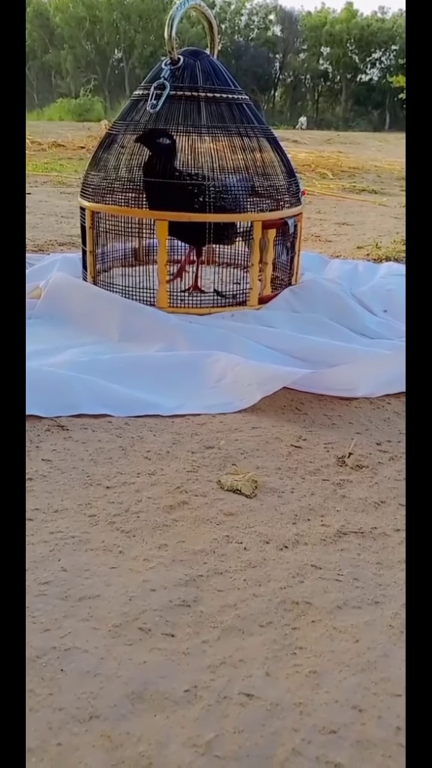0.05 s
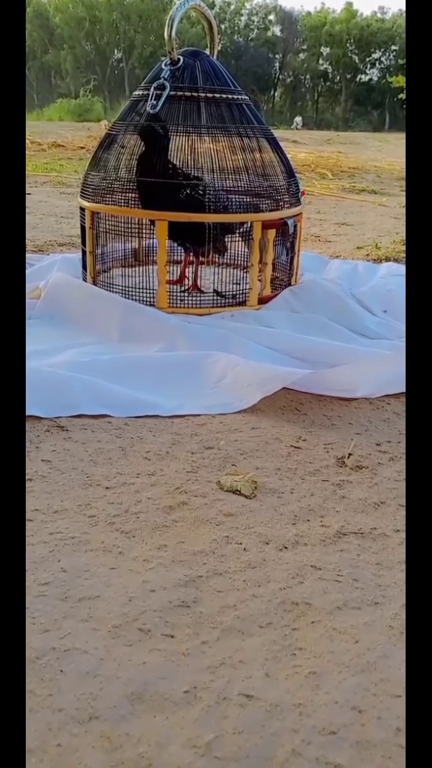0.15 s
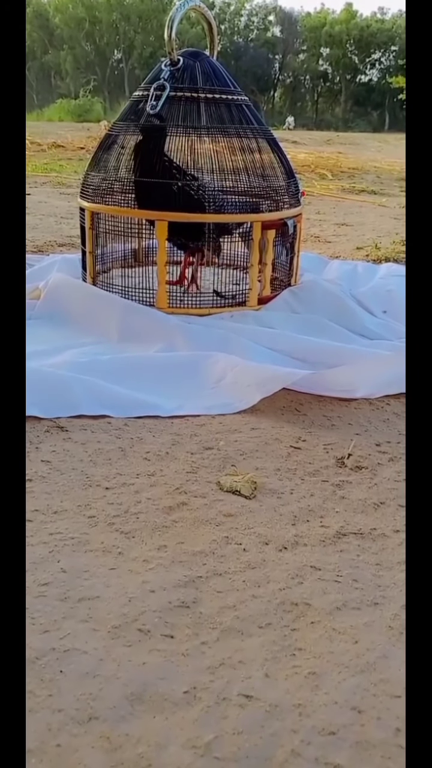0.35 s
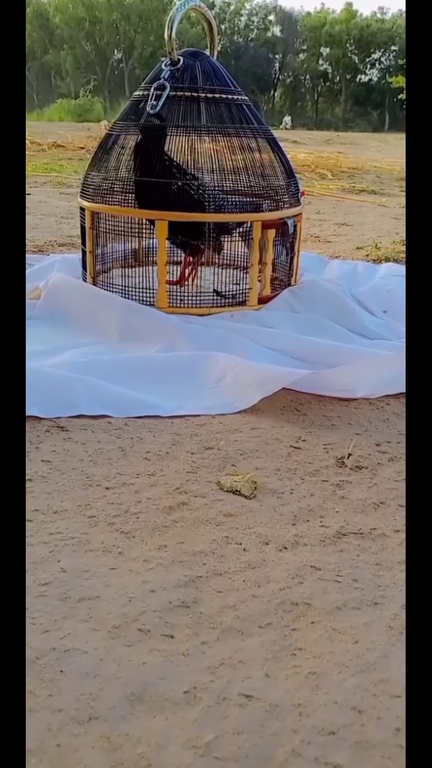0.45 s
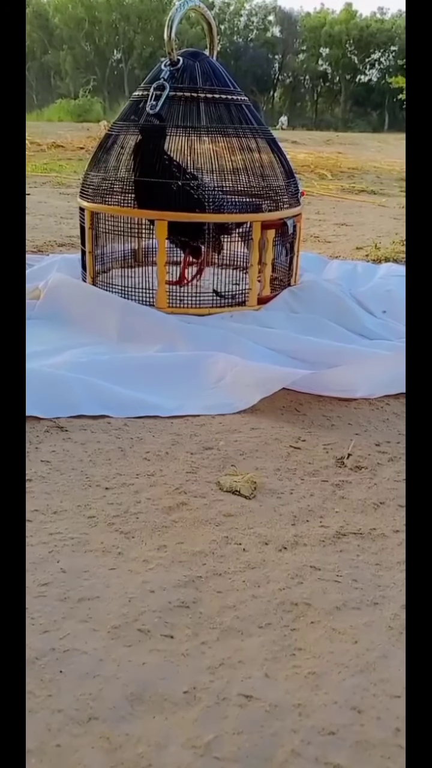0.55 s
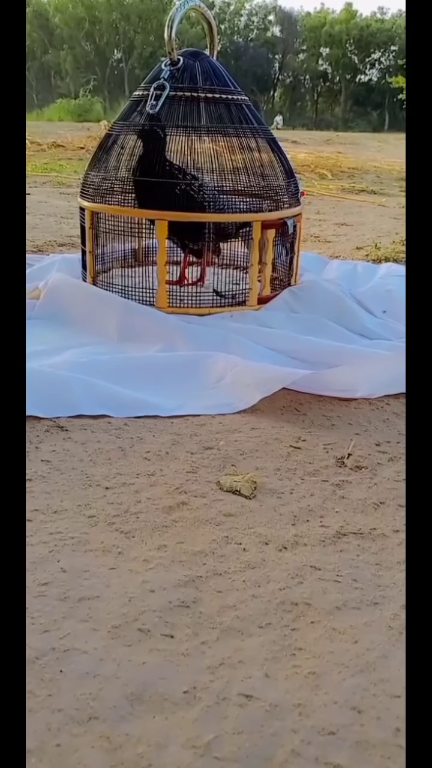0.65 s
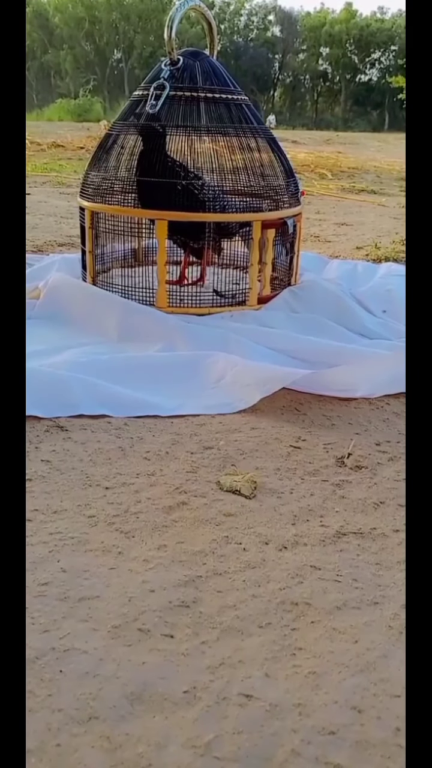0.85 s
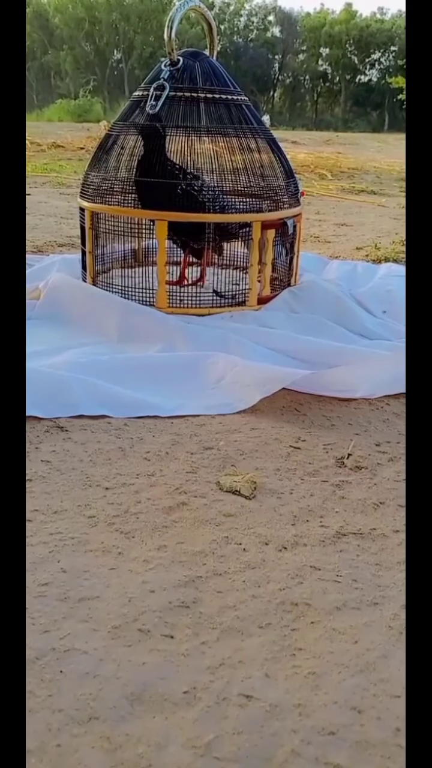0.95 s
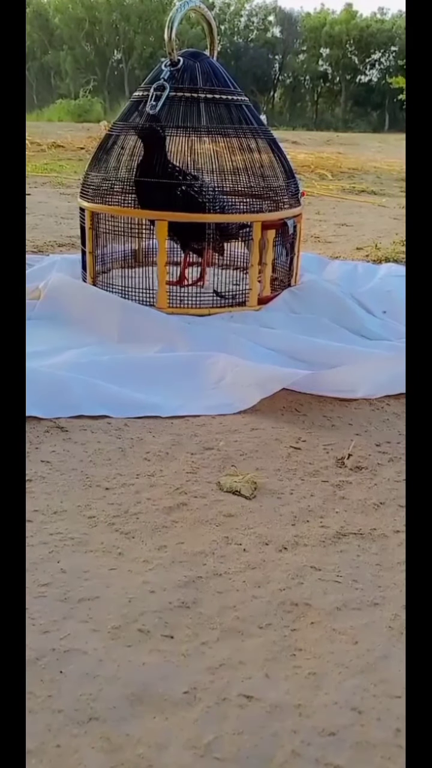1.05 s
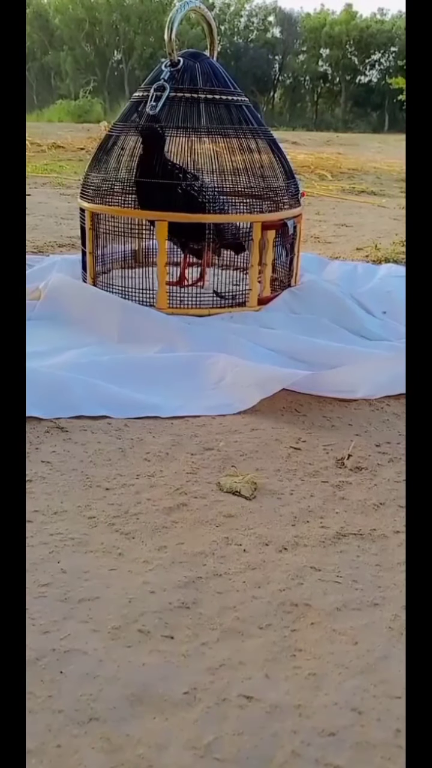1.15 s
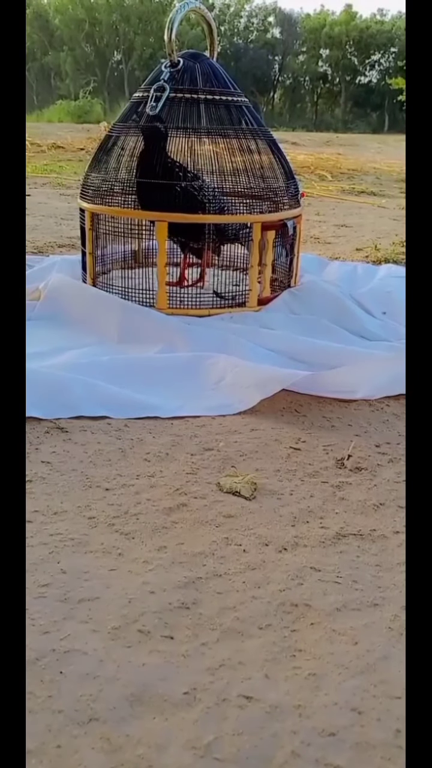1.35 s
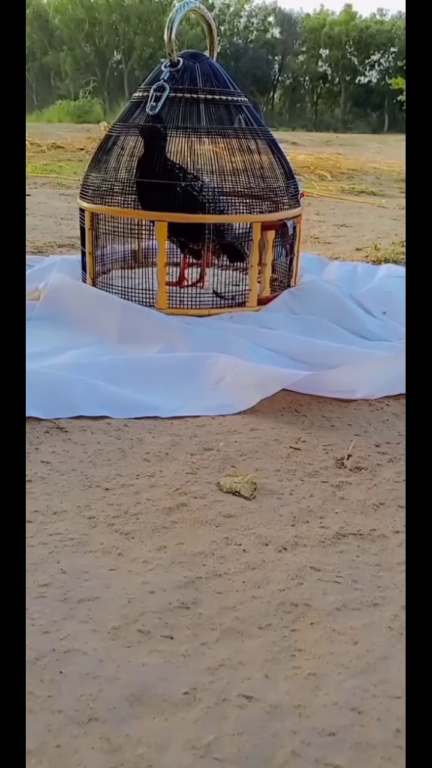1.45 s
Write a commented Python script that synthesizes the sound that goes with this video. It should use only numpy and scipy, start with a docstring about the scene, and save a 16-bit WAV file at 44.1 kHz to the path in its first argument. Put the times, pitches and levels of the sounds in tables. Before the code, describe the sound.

A caged game bird close to the microphone gives a quick cluck with a brief high whistle, pauses, then rasps several loud buzzing calls; open field, faint breeze, distant engine throb and soft echo from trees.

```python
"""A far engine throbs under gusting field air and small birds twitter far off; then a caged game bird
in an open field gives a falling cluck, harsh buzzing calls and pure whistles; then come far pips, and
a last harsh call begins as the sound ends. Pulses ring resonances for engine and calls; notes are
gliding tones; air and echo are shaped noise. Trees return a diffuse echo. The recorder turns the bass
down under loud calls and suppresses faint bands; an edit fades the sound out and in once."""
import sys
import numpy as np
from scipy import signal
from scipy.fft import rfft, irfft, next_fast_len
from scipy.io import wavfile
from scipy.ndimage import uniform_filter1d

SR = 44100
rng = np.random.default_rng(int(sys.argv[2]) if len(sys.argv) > 2 else 0)


def magnitude_from_level(level_db):
    """Linear magnitude for a level in decibels (20 dB per decade)."""
    exponent = np.asarray(level_db, float) / 20
    return 10 ** exponent


def output_pcm(signal):
    """Save a mono or channel-first signal as 16-bit PCM at the path in sys.argv[1].

    Samples are clipped to [-1, 1] before scaling.
    """
    pcm = np.clip(np.atleast_2d(signal).T, -1, 1) * 32767
    wavfile.write(sys.argv[1], SR, np.round(pcm).astype(np.int16))


N = 66150


def rms_one(x):
    """Scale to unit rms."""
    return x / np.sqrt(np.mean(x ** 2) + 1e-20)


def in_time(rows):
    """Mask of a table's time span, then its columns interpolated at every sample."""
    s, *columns = np.transpose(rows)
    t = np.arange(N) / SR
    on = (t >= s[0]) & (t <= s[-1])
    return [on] + [np.interp(t, s, c) for c in columns]


def resonate(x, hz, width_hz):
    """Two equal two-pole resonators in series, peak gain about 1; width is that of each."""
    r = np.exp(-np.pi * width_hz / SR)
    numerator = [(1 - r * r) / 2, 0, (r * r - 1) / 2]
    denominator = [1, -2 * r * np.cos(2 * np.pi * hz / SR), r * r]
    for _ in range(2):
        x = signal.lfilter(numerator, denominator, x + 1e-18)
    return x


def wobble(rate_hz):
    """Random wander of unit rms: noise through two equal low-pass poles at rate_hz."""
    r = np.exp(-2 * np.pi * rate_hz / SR)
    noise = rng.standard_normal(N + SR)
    return rms_one(signal.lfilter([1], [1, -2 * r, r * r], noise)[SR:])


def tone(rows, overtones_db, rough):
    """A gliding note with overtones; roughness shakes its strength and phase."""
    on, hz, db = in_time(rows)
    phase = 2 * np.pi * np.cumsum(hz) / SR + rough * wobble(400)
    wave = sum(magnitude_from_level(g) * np.sin((k + 1) * phase) for k, g in enumerate(overtones_db))
    return on * np.sqrt(2) * magnitude_from_level(db) * (1 + rough * wobble(430)) * wave


# rate spread at full roughness (fraction), pulse strength spread, noise decay per cycle (nepers)
JITTER, SHIMMER_DB, GATE_SHARPNESS = .05, 1.0, .8


def firing_pulses(rate_hz, rough):
    """One click per firing, a little uneven, plus noise decaying within each cycle; rms about 1."""
    cycles = np.cumsum(rate_hz * (1 + JITTER * rough * wobble(rate_hz.mean()))) / SR
    cycles = cycles - cycles[int(1.312 * SR)]  # one firing falls at 1.312 s
    count = np.floor(cycles)
    clicks = np.diff(count, prepend=count[0] - 1) * np.sqrt(SR / rate_hz)
    clicks = clicks * magnitude_from_level(SHIMMER_DB * rng.standard_normal(N))
    gate = np.exp(-GATE_SHARPNESS * (cycles % 1))
    noise = rms_one(gate * rng.standard_normal(N))
    return np.sqrt(1 - rough) * clicks + np.sqrt(rough) * noise


# far engine: (time [s], firing rate [Hz], exhaust boom level [dB], boom centre [Hz], pipe level [dB])
ENGINE_TRACK = [(0, 31.8, -46.5, 117.9, -86), (.2, 31.11, -49.5, 115.6, -93), (.26, 31.9, -49, 121.7, -80),
                (.4, 33, -67.5, 137.4, -72), (.65, 33.02, -59.5, 136.9, -77), (.85, 32.81, -72, 151, -63.5),
                (.98, 32.35, -57, 149.7, -64), (1.05, 33.38, -56, 150.8, -63),
                (1.2, 33.04, -73.5, 150.4, -70), (1.26, 32.59, -65.5, 157, -58),
                (1.5, 33.44, -77, 152, -57)]
ENGINE_ROUGH, BOOM_WIDTH_HZ, PIPE_HZ, PIPE_WIDTH_HZ = .015, 24, 344, 61


def engine():
    """Firing pulses ring a low boom whose centre drifts, and a higher pipe note."""
    _, rate_hz, boom_db, boom_hz, pipe_db = in_time(ENGINE_TRACK)
    source = firing_pulses(rate_hz, ENGINE_ROUGH)
    low, high = boom_hz.min(), boom_hz.max()
    share = (boom_hz - low) / (high - low)
    boom = (1 - share) * resonate(source, low, BOOM_WIDTH_HZ)
    boom = boom + share * resonate(source, high, BOOM_WIDTH_HZ)
    pipe = resonate(source, PIPE_HZ, PIPE_WIDTH_HZ)
    pipe = resonate(pipe, PIPE_HZ, 2 * PIPE_WIDTH_HZ)
    return magnitude_from_level(boom_db) * rms_one(boom) + magnitude_from_level(pipe_db) * rms_one(pipe)


# breeze level: (time [s], level [dB])
AIR_LEVEL = [(0, -59), (.5, -64), (1.0, -59.5), (1.2, -64), (1.5, -65.5)]
# breeze spectrum, before scaling to unit rms: (frequency [Hz], relative density [dB per Hz])
AIR_SPECTRUM = [(15, -45), (35, -21), (149, 0.5), (641, -34), (1330, -25), (2050, -34.5), (4030, -33),
                (5000, -31.5), (7310, -38), (16000, -55)]


def air():
    """Quiet field noise: coloured noise, gently gusting."""
    hz, db = np.transpose(AIR_SPECTRUM)
    bins_hz = np.fft.rfftfreq(N, 1 / SR)
    colour = magnitude_from_level(np.interp(np.log(bins_hz + 1), np.log(hz), db))
    noise = rms_one(irfft(rfft(rng.standard_normal(N)) * colour, N))
    _, level_db = in_time(AIR_LEVEL)
    return magnitude_from_level(level_db + 0.46 * wobble(15)) * noise


# far small birds, one list per note: (time [s], pitch [Hz], level [dB])
FAR_BIRD_NOTES = [
    [(.08, 5370, -82.5), (.10, 4990, -68), (.14, 4900, -74), (.15, 4520, -64.5), (.18, 4520, -72.5)],
    [(.08, 6430, -89), (.10, 5900, -71.5), (.15, 5920, -79.5)],
    [(.01, 1917, -78.5), (.05, 2000, -70.5), (.08, 1850, -82.5), (.12, 1720, -71), (.155, 1604, -80.5),
     (.2, 1560, -86.5)],
    [(.32, 1808, -79.5), (.39, 1835, -66), (.414, 1900, -66.5), (.436, 1765, -71.5), (.45, 1917, -65),
     (.49, 1920, -103)],
    [(.385, 2700, -82), (.405, 2500, -60.5), (.42, 2377, -74), (.44, 2500, -88)],
    [(.15, 2950, -88.5), (.18, 2870, -77), (.215, 3000, -82)],
    [(.195, 1355, -82.5), (.21, 1320, -67), (.22, 1350, -84)],
]


def far_birds():
    """Far twitter: single wavering partials, gliding in pitch."""
    return sum(tone(rows, [0], rough=.4) for rows in FAR_BIRD_NOTES)


# echo of the trees: (frequency [Hz], early level [dB], early t60 [s], late level [dB], late t60 [s])
TREE_ECHO = [(1000, -23, 0.19, -44, 0.74), (2000, -27.5, 0.14, -37.5, 1), (2700, -22, 0.15, -36, 0.81),
             (4000, -21, 0.21, -29.5, 0.27), (4980, -21, 0.096, -32, 1), (5070, -12, 0.22, -28, 1),
             (6520, -17.5, 0.23, -31, 1), (7100, -14, 0.26, -40.5, 0.93), (9070, -26, 0.46, -58.5, .3),
             (11220, -18.5, 0.28, -62, .3), (12600, -5, 0.25, -58.5, 0.28),
             (15230, -15.5, 0.18, -57.5, 0.36)]
ECHO_RISE_S, ECHO_CURVE = .022, 1.52  # curve > 1: the early part dies ever faster


def trees(x):
    """Scattered echo: noise dying band by band, a quick part and a faint long part."""
    size = next_fast_len(2 * N)
    t, hz = np.arange(N) / SR, np.fft.rfftfreq(N, 1 / SR)
    centres = np.log([row[0] for row in TREE_ECHO])
    response = 0
    for k, (_, db, t60, late_db, late_t60) in enumerate(TREE_ECHO):
        share = np.interp(np.log(hz + 1), centres, np.arange(len(TREE_ECHO)) == k)
        band = irfft(rfft(rng.standard_normal(N)) * np.sqrt(share), N)
        early = magnitude_from_level(db - 60 * (t / t60) ** ECHO_CURVE) / np.sqrt(t60)
        late = magnitude_from_level(late_db - 60 * t / late_t60) / np.sqrt(late_t60)
        response = response + band * (early + late)
    rise = 1 - np.exp(-(t / ECHO_RISE_S) ** 2)
    response = response * rise * np.sqrt(2 * np.log(1000) / SR)
    return irfft(rfft(x, size) * rfft(response, size), size)[:N]


# cluck: (time [s], pitch [Hz], level [dB])
CLUCK_NOTE = [(.217, 3700, -45), (.221, 3520, -13.5), (.2245, 3305, -16), (.226, 2248, -22),
              (.231, 2265, -16), (.233, 1660, -28.5), (.236, 1380, -26.5), (.24, 1250, -42.5)]
# cluck harmonics from the fundamental up: level re note [dB]
CLUCK_HARMONICS_DB = [-3.5, -12, -21, -17.5, -13.5, -44.5]


def cluck():
    """A fast falling note, rich in harmonics and slightly rough."""
    return tone(CLUCK_NOTE, CLUCK_HARMONICS_DB, rough=0.15)


FLUTTER_HZ, FLUTTER_WANDER, FLUTTER_SHAKE_RAD = 1542.6, .022, 0.2
FLUTTER_RISE_S, FLUTTER_DECAY_S = .0002, .0055


def syrinx(rate_hz, rough):
    """Each pulse is a short run of quick slaps starting afresh, plus breath noise gated by the cycle."""
    rate_hz = rate_hz * (1 + JITTER * rough * wobble(150))
    cycles = np.cumsum(rate_hz) / SR
    since_s = cycles % 1 / rate_hz
    chance = rng.standard_normal((int(cycles[-1]) + 1, 2))[cycles.astype(int)]  # one draw per pulse
    flutter_hz = FLUTTER_HZ * (1 + FLUTTER_WANDER * (wobble(23) + rough * chance[:, 0]))
    shake = FLUTTER_SHAKE_RAD * wobble(580)
    phase = 2 * np.pi * flutter_hz * since_s + shake
    slaps = sum(np.cos(k * phase) for k in range(1, 11))
    rise = 1 - np.exp(-since_s / FLUTTER_RISE_S)
    shape = rise * np.exp(-since_s / FLUTTER_DECAY_S) * np.sqrt(1 - cycles % 1)
    breath = np.exp(-GATE_SHARPNESS * (cycles % 1)) * rng.standard_normal(N)
    rough = np.clip(rough, 0, 1)
    mix = np.sqrt(1 - rough) * rms_one((.5 + slaps) * shape) + np.sqrt(rough) * rms_one(breath)
    return magnitude_from_level(SHIMMER_DB * chance[:, 1]) * mix


# harsh stretches, one list each: (time [s], level [dB], syrinx pulse rate [Hz],
# low throat resonance re level [dB], roughness [0-1])
HARSH_STRETCHES = [
    [(.223, -43, 404.5, -10, 1), (.226, -30, 415, -15.5, 0.32), (.232, -28, 432, -6.5, 0.4),
     (.242, -60, 388, 0.5, 0.1)],
    [(.253, -50, 418, -104, 0.7), (.257, -15, 391.6, -35.5, 1), (.261, -52.5, 410, 9, 1)],
    [(.286, -54.5, 398.7, -6, 0.8), (.290, -17.5, 402.6, -17.5, 0.34), (.297, -44.5, 413, -4, 0.25)],
    [(.669, -30, 270, -16, .7), (.672, -17.5, 270, -27, .3), (.70, -17.5, 277, -35, .35),
     (.732, -17, 268, -50, .4), (.76, -16.5, 274, -44, .25), (.79, -15, 270, -40, .2),
     (.797, -18, 255, -36, .4), (.805, -16, 238, -32, .35), (.809, -24.5, 212.7, -17, 0.16),
     (.824, -47, 220, -4, 1)],
    [(1.002, -50, 250, -3, .7), (1.004, -33, 250, -8, .7), (1.011, -31, 252, -8, .6),
     (1.015, -20, 255, -16, .3), (1.03, -17.5, 268, -24, .2), (1.045, -17.5, 277, -33, .2),
     (1.056, -17, 283, -42, .15), (1.075, -16.5, 271, -42, .08), (1.094, -16, 271, -36, .03),
     (1.125, -16.5, 270, -45, .15)],
    [(1.145, -12, 273.3, -11.5, 0.4), (1.165, -17, 268.6, -39, 0.5), (1.178, -17.5, 271.2, -39.5, 0.01),
     (1.182, -30, 260, -39.5, 0.3)],
    [(1.199, -29, 272.7, -20.5, 0.8), (1.202, -19, 274.3, -31.5, 0.55), (1.226, -16.5, 263, -25, 0.46),
     (1.233, -28.5, 265.5, -6.5, 0.55), (1.24, -36, 234, -15, .8), (1.247, -59.5, 250, -17, 0.7)],
    [(1.493, -44, 290, 8.5, 0.9), (1.497, -22.5, 297, -20.5, 0.23), (1.5, -18.5, 269.1, 1, 0)],
]
# windpipe and beak resonances: (frequency [Hz], width [Hz], relative level [dB], growth [dB per s])
THROAT_RESONANCES = [(3006, 740, 0.5, 3), (3810, 450, -8.5, 8.5), (4590, 565, -2, 7), (5440, 320, -6, 8),
                     (5820, 250, -13.5, 42), (6510, 610, -9.5, -7), (7550, 500, -11.5, -26),
                     (8706, 850, -19, 7.5), (9594, 600, -16.5, 6), (11285, 930, -20.5, 6),
                     (13900, 1700, -29, 7), (15700, 1100, -22, 12.5)]
# low throat resonances: (frequency [Hz], width [Hz], relative level [dB])
LOW_THROAT_RESONANCES = [(1130, 300, -4.5), (1700, 416, -2), (2300, 500, -2.5)]
# faint body resonances: (frequency [Hz], width [Hz], level re call [dB])
CHEST_RESONANCES = [(293.3, 39, -44.5), (555, 130, -43.5), (809, 320, -44)]
THROAT_LOW_EDGE_HZ, THROAT_WAVER_DB, EVENING_S = 2922, 2.0, .012


def harsh_calls():
    """Syrinx pulses ring the throat; a low resonance opens as the beak closes; clear pulses hum the chest."""
    voice, body = 0, 0
    edge = signal.butter(10, THROAT_LOW_EDGE_HZ, "high", fs=SR, output="sos")
    for rows in HARSH_STRETCHES:
        on, db, rate_hz, low_db, rough = in_time(rows)
        source = syrinx(rate_hz, rough)
        since_s = on * (np.arange(N) / SR - rows[0][0])

        high, low, chest = 0, 0, 0
        for k, (hz, width_hz, g, growth_db_per_s) in enumerate(THROAT_RESONANCES):
            gain_db = g + growth_db_per_s * since_s + THROAT_WAVER_DB * wobble(22)
            ringing = resonate(source, hz, width_hz) / np.sqrt(width_hz)
            high = high + (-1) ** k * magnitude_from_level(gain_db) * ringing
        high = signal.sosfilt(edge, rms_one(high))
        # the voice keeps its level steady
        high = high / np.sqrt(uniform_filter1d(high ** 2, size=int(EVENING_S * SR)) + 1e-12)

        for k, (hz, width_hz, g) in enumerate(LOW_THROAT_RESONANCES):
            low = low + (-1) ** k * magnitude_from_level(g) * resonate(source, hz, width_hz) / np.sqrt(width_hz)
        for hz, width_hz, g in CHEST_RESONANCES:
            chest = chest + magnitude_from_level(g + 4.3 * wobble(18)) * rms_one(resonate(source, hz, width_hz))

        voice = voice + on * magnitude_from_level(db) * (high + magnitude_from_level(low_db) * rms_one(low))
        body = body + on * magnitude_from_level(db) * (1 - np.clip(rough, 0, 1)) ** 2 * chest
    return voice, body


# whistles, one list each: (time [s], pitch [Hz], level [dB])
WHISTLE_NOTES = [
    [(.255, 5800, -40), (.257, 5873, -16), (.2598, 6100, -18), (.2612, 6300, -11.5), (.265, 6400, -12.5),
     (.275, 6440, -12), (.284, 6250, -13), (.288, 5980, -18), (.291, 5900, -50)],
    [(1.176, 6250, -34), (1.179, 6330, -15), (1.182, 6480, -15.5), (1.1835, 6720, -21.5),
     (1.19, 6880, -22.5), (1.196, 6900, -27), (1.199, 6800, -22), (1.2006, 6620, -13), (1.2018, 6400, -40)],
]
# whistle harmonics from the fundamental up: level re note [dB]
WHISTLE_HARMONICS_DB = [0, -27]


def whistles():
    """Nearly pure gliding notes with a faint second harmonic."""
    return sum(tone(rows, WHISTLE_HARMONICS_DB, rough=.02) for rows in WHISTLE_NOTES)


# far pips: (time [s], level [dB])
PIP_PEAKS = [(1.411, -64), (1.429, -62.5), (1.447, -61)]
PIP_HZ, PIP_HALF_S = 2500, 0.0087


def far_pips():
    """Short steady-pitch tones, each swelling to a peak and falling."""
    pips = 0
    for s, db in PIP_PEAKS:
        rows = [(s - PIP_HALF_S, PIP_HZ, db - 17), (s, PIP_HZ, db), (s + PIP_HALF_S, PIP_HZ, db - 19)]
        pips = pips + tone(rows, [0], rough=.15)
    return pips


def scene():
    """Bird, echo and background; the small body radiates little below the low throat resonance."""
    far = far_birds() + far_pips()
    voice, chest = harsh_calls()
    voice = voice + cluck() + whistles()
    radiation = signal.butter(5, 1214, "high", fs=SR, output="sos")
    bird = chest + signal.sosfilt(radiation, voice)
    return (engine() + air() + far + bird + trees(bird + far))[None]


# suppressor floor: (frequency [Hz], level [dB per bin])
SUPPRESSOR_FLOOR = [(600, -110), (3000, -89.5), (7000, -89), (9000, -93), (16000, -93)]


def suppress(x):
    """Noise suppressor: each band is turned down as its smoothed power nears a fixed floor."""
    hz, _, frames = signal.stft(x, SR, nperseg=512)
    power = uniform_filter1d(np.abs(frames) ** 2, size=9, axis=1)  # over bands
    power = uniform_filter1d(power, size=5, axis=2)  # over time
    floor_db = np.interp(hz, *np.transpose(SUPPRESSOR_FLOOR), left=-200)
    floor = magnitude_from_level(floor_db)[:, None] ** 2
    gain = np.maximum(power ** 2 / (power ** 2 + floor ** 2), magnitude_from_level(-7.5))  # at most 7.5 dB down
    return signal.istft(frames * gain, SR, nperseg=512)[1][:, :N]


def low_pass(x):
    """Removes everything above the highest recorded frequency."""
    return signal.sosfilt(signal.butter(12, 16450, fs=SR, output="sos"), x)


def record(dry):
    """Lopsided soft overload, bass ducking under loud sound, suppressor, one fade, treble peak, top cut."""
    overload_top, overload_skew = 0.8, 0.003
    duck_above_db, duck_db_per_db, release_db_per_s = -42, 0.76, 254.5
    fade_out_s, fade_in_s, fade_length_s, fade_power = 1.112, 1.147, .013, 2.2
    t = np.arange(N) / SR

    dry = overload_top * np.tanh((dry + overload_skew * dry ** 2) / overload_top)

    bass = signal.sosfiltfilt(signal.butter(2, 480, fs=SR, output="sos"), dry)
    level_db = 10 * np.log10(uniform_filter1d(dry[0] ** 2, size=256) + 1e-12)
    # instant attack, steady release
    held_db = np.maximum.accumulate(level_db + release_db_per_s * t) - release_db_per_s * t
    excess_db = uniform_filter1d(np.maximum(held_db - duck_above_db, 0), size=512)
    ducked = dry - bass + bass * magnitude_from_level(-duck_db_per_db * excess_db)

    fade_out = 1 - (t - fade_out_s) / fade_length_s
    fade_in = (t - fade_in_s) / fade_length_s
    fade = np.clip(np.maximum(fade_out, fade_in), 0, 1) ** fade_power
    mix = suppress(ducked) * fade

    mix = mix + magnitude_from_level(7) * resonate(mix, hz=15150, width_hz=600)  # microphone peak
    mix = signal.sosfilt(signal.cheby2(16, 50, 15800, fs=SR, output="sos"), mix)
    return low_pass(mix)


dry = scene()
out = record(dry)
output_pcm(out)
```